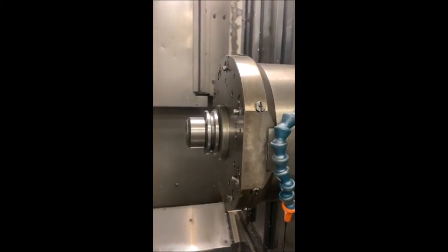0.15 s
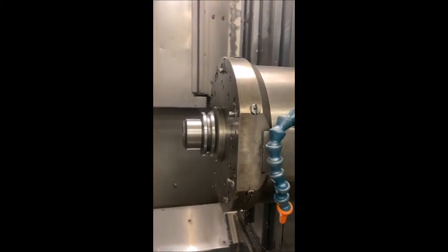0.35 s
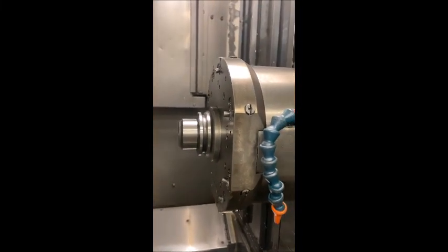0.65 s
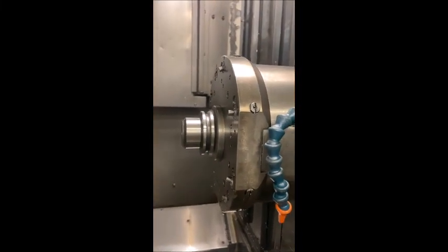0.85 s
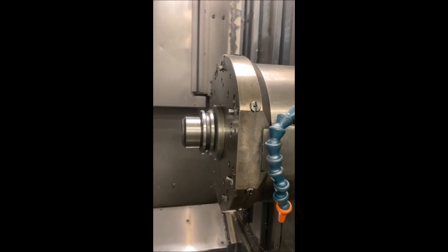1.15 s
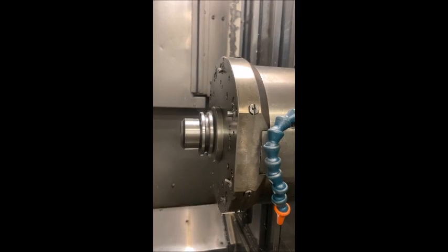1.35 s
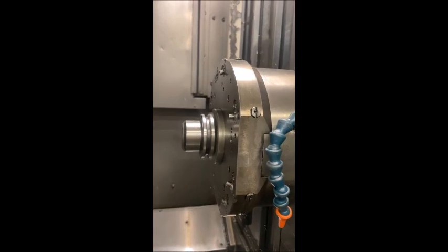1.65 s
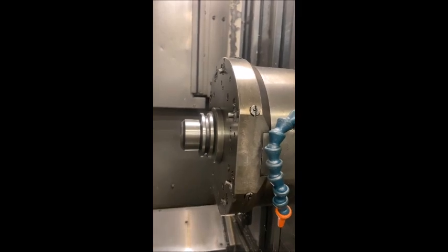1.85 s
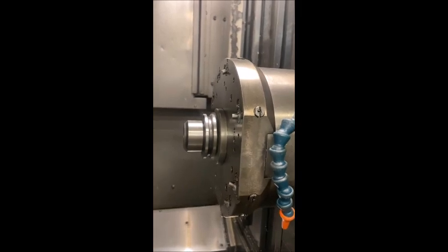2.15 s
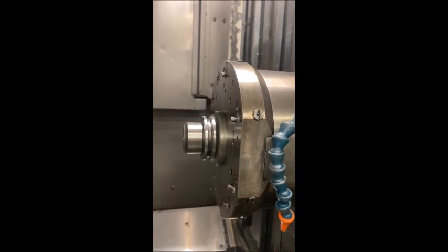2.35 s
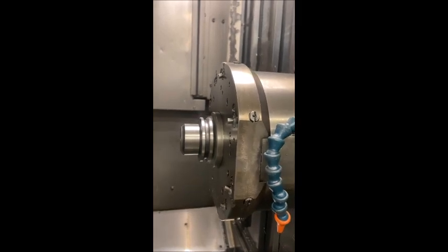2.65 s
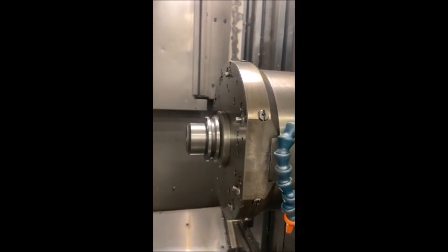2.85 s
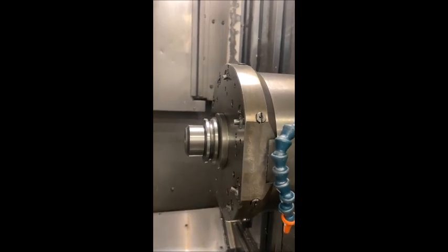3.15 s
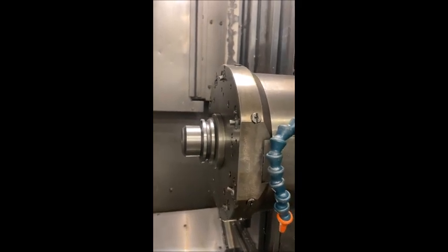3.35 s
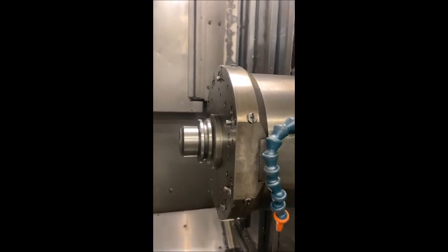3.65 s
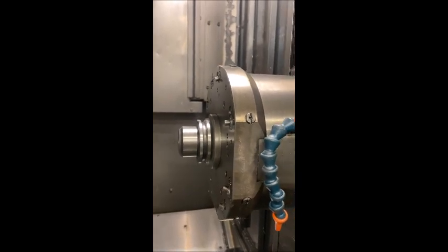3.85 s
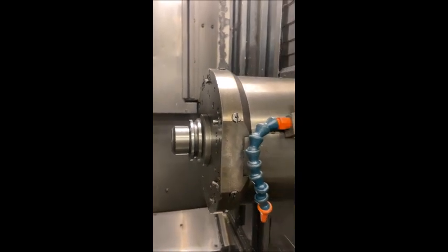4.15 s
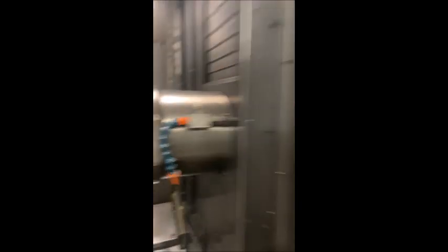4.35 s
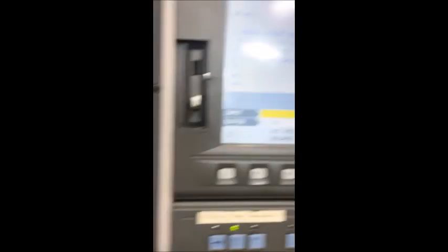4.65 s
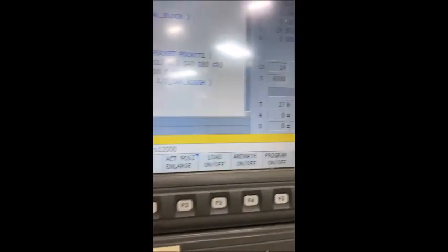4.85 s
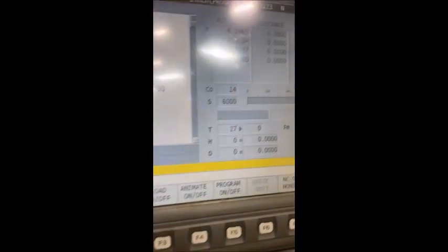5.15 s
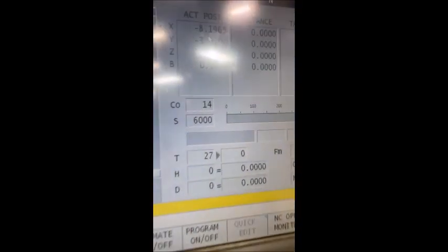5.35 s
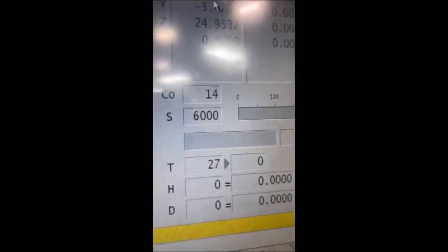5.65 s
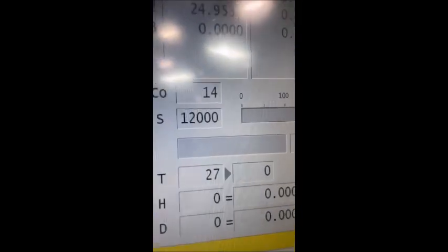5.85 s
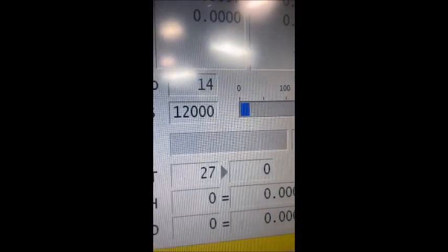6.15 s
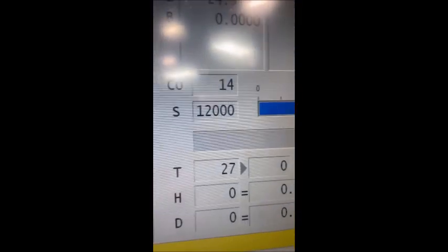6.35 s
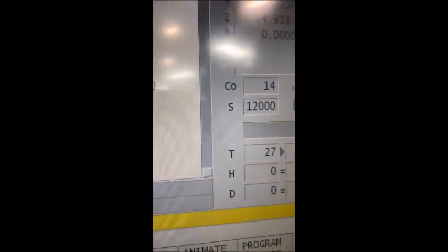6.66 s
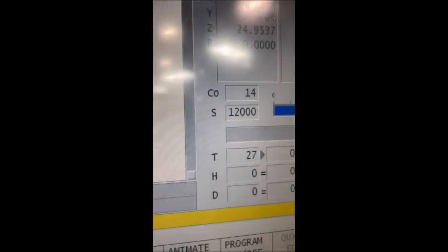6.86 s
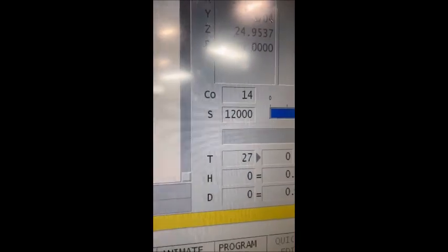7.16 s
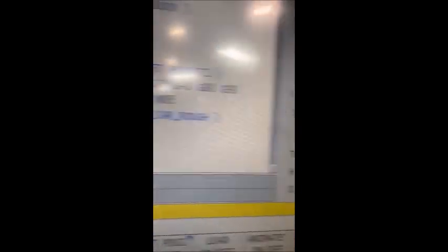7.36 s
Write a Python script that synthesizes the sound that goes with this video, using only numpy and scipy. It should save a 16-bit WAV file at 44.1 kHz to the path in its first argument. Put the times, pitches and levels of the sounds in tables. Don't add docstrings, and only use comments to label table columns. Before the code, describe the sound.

Inside an open steel machine cabin, an unloaded spindle runs with an even bearing whir, low hum and airy noise. The handheld phone swings away to the control panel, dulling the whir and bringing out a fluttering fan drone. A relay clicks, a shrill motor whine climbs for nearly a second in the reverberant hall, then stops climbing, leaving a louder, faster rushing hum.

```python
import sys
import numpy as np
from scipy import signal
from scipy.fft import rfft, irfft, next_fast_len
from scipy.io import wavfile
from scipy.ndimage import uniform_filter1d, map_coordinates

SR = 44100
rng = np.random.default_rng(int(sys.argv[2]) if len(sys.argv) > 2 else 0)


def natural_amplitude(level_db):
    exponent = np.asarray(level_db, float) / 20
    return 10 ** exponent


def store_wav(level_fs):
    pcm = np.round(np.clip(np.atleast_2d(level_fs), -1, 1) * 32767)
    wavfile.write(sys.argv[1], SR, pcm.T.astype(np.int16))


N = 331191
T = np.arange(N) / SR


def walk(rate_hz, size=N):
    k = int(SR / rate_hz)
    held = np.repeat(rng.standard_normal(size // k + 1), k)
    return 1.31 * uniform_filter1d(uniform_filter1d(held, k), k)[:size]


def lagged(x, seconds):
    k = int(seconds * SR)
    return uniform_filter1d(x, size=k, origin=(k - 1) // 2, mode="nearest")


def resonance_db(hz, peaks):
    return sum(db / (1 + (2 * (hz - at) / max(width, at / 50)) ** 2) for at, width, db in peaks)


def ring(x, hz, t60_s):
    r = np.exp(-np.log(1000) / (t60_s * SR))
    return signal.lfilter([1 - r, 0, r - 1], [1, -2 * r * np.cos(2 * np.pi * hz / SR), r * r], x)


def tones(turns, table, share, wobble_db, drift_rad, rate_hz):
    out, heard = np.zeros((2, N)), share > 0
    turns = turns[heard]
    turns_per_khz = np.ptp(turns) * SR / len(turns) / 3000
    left, right = np.zeros((2, len(turns)), np.float32)
    for multiple, left_db, right_db, lead_rad in table:
        sway = walk(rate_hz, size=len(turns))
        angle = 2 * np.pi * (multiple * turns % 1 + rng.random())
        angle += drift_rad * (1 + multiple * turns_per_khz) * sway
        angle = angle.astype(np.float32)
        size = np.sqrt(2) * natural_amplitude(wobble_db * sway[::-1])
        left += natural_amplitude(left_db) * size * np.sin(angle)
        right += natural_amplitude(right_db) * size * np.sin(angle + np.float32(lead_rad))
    out[:, heard] = left, right
    return share * out


# hz, width_hz, side_lift_db
PORTS_DIFFER = [(3130, 750, 4), (5650, 500, -2), (2000, 300, -2.5)]
PORTS_AGREE = 15100, 1300, 9.5


def air(table, peaks, flicker_db, share):
    heard = share > 0
    size = next_fast_len(int(heard.sum()))
    f = np.maximum(np.arange(size // 2 + 1) * SR / size, 1)
    hz, *columns = np.transpose(table)
    mid_db, side_db, like, lead_rad = (np.interp(np.log(f), np.log(hz), c) for c in columns)
    lift_db = resonance_db(f, peaks) - 40 * (f < 30)
    lift_db += 1.8 * np.interp(f, np.arange(0, SR / 2, 25), rng.standard_normal(SR // 50))
    side_db += resonance_db(f, PORTS_DIFFER)
    mid_db += resonance_db(f, [PORTS_AGREE])
    like = np.clip(like, 0, .95)
    a, b = rfft(rng.standard_normal((2, size)))
    mid = a * natural_amplitude(mid_db + lift_db)
    side = like * a * np.exp(1j * lead_rad) + np.sqrt(1 - like ** 2) * b
    side = side * natural_amplitude(side_db + lift_db)
    ports = np.array([mid + side, mid - side])
    out = np.zeros((2, N))
    for centre_hz in 2. ** np.arange(5, 15, 1.5):
        band = np.clip(1 - abs(np.log2(f / centre_hz)) / 1.5, 0, 1)
        flicker = natural_amplitude(flicker_db * (1.5 + centre_hz / 9000) * walk(13, size=size))
        wave = flicker * irfft(band * ports, size)
        out[:, heard] += wave[:, :heard.sum()]
    return share * out * np.sqrt(SR / 2)


# hz, mid_db_per_hz, side_db_per_hz, likeness_0_1, side_leads_rad
AIR_DOOR = [(36, -77, -63, .2, 1), (155, -55.5, -71, .1, 4), (266, -57, -70.5, 0.3, -3.5),
            (412, -72, -72, 0.05, 0.5), (1330, -70.5, -70.5, 1, -4.5), (5500, -78, -81.5, 0.38, -4.5),
            (8700, -83, -74, .4, -5), (14100, -104, -88.5, .07, -2)]
AIR_PANEL = [(35, -61.5, -89, 0.18, -2), (146, -55, -85, .1, -1), (273, -57.5, -74.5, .9, -2.5),
             (530, -70.5, -70.5, .4, -3), (1070, -72, -69, 0.14, 0.5), (5300, -79, -83, 0.3, 2),
             (8530, -95, -86, .4, 1.6), (15000, -114, -101, 0.056, 1)]
AIR_FAST = [(35, -60, -100, .4, -2), (150, -53.5, -71, .2, -3), (254, -59, -72, .4, -3.5),
            (700, -69.5, -66, .3, -4), (1100, -73, -72, 0.26, 1), (5870, -74.5, -78, .45, 1.6),
            (9840, -94, -81.5, .5, 1.6), (15000, -105, -91, .1, 0)]
# hz, width_hz,
# lift_db
CABIN = [(960, 73, 9.5), (1820, 86, 5.5), (2538, 65, 7.5), (2665, 62, 7), (3157, 54, 7.5), (3246, 50, 8),
         (3300, 50, 0.5), (3520, 143, 11.5), (4150, 70, 5), (4440, 230, 5.5), (4960, 80, 11.5),
         (5070, 60, 6), (5345, 130, 12.5), (6350, 110, 7), (6760, 80, 5.5), (7500, 220, -14.5),
         (11350, 5900, -5),
         (2090, 430, -3), (2940, 580, 3), (9630, 1450, -4), (141, 9.7, -5.5), (188, 6.3, -5),
             (215, 15, -3), (289, 11, -5.5), (378, 15, -2.5), (45, 11, 17), (83, 8, 7), (690, 36, 4)]
HALL = [(258, 20, 2.5), (508, 45, 7.5), (693, 21, 3), (2800, 40, 6), (3206, 50, 8), (3330, 58, -2),
        (4400, 120, 3), (13000, 5300, -4.5)]
PANEL_DIPS = [(1870, 450, -3.5), (3390, 420, 4)]
FAST_LIFTS = [(1910, 190, 4.5), (334, 39, 3), (3580, 30, 2.8), (980, 62, 6.8)]


def air_noise(door, panel, fast):
    strain_db = 2 * np.exp(-((T - 6.2) / .15) ** 2)
    slow = panel * np.sqrt(1 - fast) * natural_amplitude(strain_db)
    noise = air(AIR_DOOR, CABIN, .4, door)
    noise += air(AIR_FAST, HALL + FAST_LIFTS, .5, panel * np.sqrt(fast))
    return noise + air(AIR_PANEL, HALL + PANEL_DIPS, .88, slow)


# hz, left_db, right_db, right_leads_rad
HUM = [
    [(239, -50.5, -49, 0.25), (267.5, -43.5, -40.5, -0.04), (301.4, -53.5, -49, 0.57), (349, -51, -49, 1.07), (504, -55.5, -52, 0.97), (532, -55, -51.5, 0.02), (775, -52, -57, 0.28), (880, -66, -63, -0.15)],
    [(176.6, -41, -41, 0), (446, -67, -62, -1), (697, -66, -50, 1.8), (764, -61, -50.5, 2.2), (959, -56, -55, -1), (898, -53, -50.5, 1), (2064, -56.5, -59.5, 0.5), (2556, -53, -55, 0.93), (2830, -63.5, -60, -1.5), (3435, -55, -50.5, -1.64)],
]
# hz, level_db
BASS_HUM = [(41.4, -51), (59.8, -34), (71.8, -41), (120, -37.5), (164.7, -43), (200, -47)]


def hum(door, panel):
    bass = [(hz, db, db, 0) for hz, db in BASS_HUM]
    at_door = tones(T, HUM[0], door, 1.16, .37, 6) + tones(T, bass, door, 1.4, .29, 6)
    return at_door + tones(T, HUM[1], panel, 3.1, .83, 8)


# hz, left_db, right_db, right_leads_rad
MAINS = [(59.9, -41.5, -41.5, -0.0), (120.2, -32.0, -32.0, 0.0), (240.3, -36.0, -35.5, 0.12),
         (300.2, -48.0, -44.5, 0.11)]
PANEL_FAN = [(512.6, -49, -43, 0.54), (527, -54, -42.5, -1.4)]
FAN_THIRD = [(776, -47, -44, 1.86)]
FAN = [
    (256.5, 0.5, 2, .1),
    (251.4, -1, 0, 0.11),
    (268.5, -6.5, -7.5, 0.082),
]
# peak_s, lift_db
SURGES = [(4.62, 6.5), (4.76, 10), (4.94, 9), (5.38, 14.5), (5.62, 8.5), (5.72, 6.5), (6.09, 13.5),
          (6.32, 11.5), (6.58, 7), (6.68, 2), (6.86, 9.5), (7.06, 14.5), (7.44, 0)]


def fan(panel, fast):
    overtone_db = 11 * (np.clip((T - 4.52) / .47, 0, 1) - 1)
    mains = tones(T, MAINS[:2] + MAINS[3:], panel, 1, .25, 6.52)
    mains += tones(T, MAINS[2:3], panel * natural_amplitude(overtone_db), 1.8, .28, 8.96)
    closer = np.clip((T - 5.23) / .21, 0, 1)
    nearest_db = 5 * np.exp(-((T - 5.55) / .25) ** 2)
    small = tones(T, PANEL_FAN, panel * natural_amplitude(7.5 * (closer - 1.5) + nearest_db), 4.1, 2.1, 30)
    shade_db = 6.5 * closer * (1.5 - .74 * fast)
    small += tones(T, FAN_THIRD, panel * natural_amplitude(-shade_db), 4, 1.9, 14)
    base_db, rise_s, fall_s = -39, .04, .053
    surge_db = sum(db * np.exp(-((T - s) / np.where(T < s, rise_s, fall_s)) ** 2) for s, db in SURGES)
    blade = tones(T, FAN[:1], panel * natural_amplitude(base_db + surge_db), .64, .98, 8.8)
    return mains + small + blade + tones(T, FAN[1:], panel * natural_amplitude(base_db), 2.5, .56, 8)


# start_s, peak_db, hz, t60_s, side_share_0_1
KNOCKS = [
    (2.1305, -19, 1600, 0.0058, 0.9),
    (2.1315, -15, 2840, .004, 0.5),
    (4.385, -19.5, 55.4, 0.18, 0),
    (5.795, -18, 2600, 0.0049, 1),
    (5.795, -18, 1260, 0.0087, 0.75),
]


def knocks():
    out = np.zeros((2, N))
    for start_s, db, hz, t60_s, side in KNOCKS:
        t = np.maximum(T - start_s, 0)
        knock = natural_amplitude(db) * np.sin(2 * np.pi * hz * t) * np.exp(-np.log(1000) * t / t60_s)
        out += knock * np.array([[1], [1 - 2 * side]])
    return out


IDLE_HZ, TOP_HZ = 100, 200
CLIMB_S, CLIMB_LENGTH_S, BEND_S, TORQUE_RISE_S = 5.905, .915, .87, .03


def speed():
    since_s = np.clip(T - CLIMB_S, 0, CLIMB_LENGTH_S)
    gained = np.expm1(-since_s / BEND_S) / np.expm1(-CLIMB_LENGTH_S / BEND_S)
    return IDLE_HZ + (TOP_HZ - IDLE_HZ) * lagged(gained, TORQUE_RISE_S)


def shaken(wave, door_db, panel_db, modes, door, panel):
    rung = sum(natural_amplitude(db) * ring(wave * panel, hz, t60_s) for hz, t60_s, db in modes)
    direct = (natural_amplitude(door_db) * door + natural_amplitude(panel_db) * panel) * wave
    return np.sqrt(2) * (direct + rung)


# hz, t60_s, level_db
UNBALANCE_MODES = [(100, 1.2, -34.5), (123.2, 0.92, -18), (130.7, 0.59, -16), (147.7, 0.36, -22.5),
                   (164.7, 0.13, -27), (199.4, 2.65, -19)]
OVALITY_MODES = [(238, 1, -25), (342, .15, -40.5), (390.3, 0.36, -33.5), (400.5, 2.8, -29)]


def body_shake(turns, door, panel):
    unbalance = np.sin(2 * np.pi * turns)
    ovality = np.sin(4 * np.pi * turns + np.array([[0], [-.7]]))
    body = shaken(unbalance, -30.5, -55.5, UNBALANCE_MODES, door, panel)
    return body + shaken(ovality, -56.5, -64, OVALITY_MODES, door, panel)


PORT_LAG_SAMPLES = 5


def hall(x, near_t60_s, far_t60_s, direct_db, far_db, like):
    t = np.arange(SR) / SR
    near, far = rng.standard_normal((2, 2, len(t)))
    far = signal.sosfilt(signal.butter(3, 6200, fs=SR, output="sos"), far)

    def decay(t60_s):
        return np.exp(-np.log(1000) * t / t60_s) / np.sqrt(t60_s * SR / np.log(1000) / 2)

    shared, own = .8 * (near * decay(near_t60_s) + natural_amplitude(far_db) * far * decay(far_t60_s))
    shared[0] += natural_amplitude(direct_db)
    right = -like * np.roll(shared, PORT_LAG_SAMPLES) + np.sqrt(1 - like ** 2) * own
    return signal.fftconvolve(x[None], np.array([shared, right]), axes=1)[:, :N]


# hz, width_hz, lift_db
HOUSING = [(4400, 150, 4.5), (5400, 220, 3), (5710, 670, 11.7), (6350, 380, 6.5), (7250, 340, 10.7),
           (7580, 300, 5.4), (8200, 680, 5)]
STATOR_HOUSING = [(5200, 1000, 14), (6640, 400, 12), (7050, 500, 14)]


def motor_whine(hz, turns):
    torque = (T > CLIMB_S) * (T < CLIMB_S + CLIMB_LENGTH_S + TORQUE_RISE_S / 2)
    rotor_slots, stator_slots = 44, 36
    rotor_hz, stator_hz = rotor_slots * hz, stator_slots * hz
    rotor_db = -40 - 2.5 * (rotor_hz - rotor_hz[0]) / 1000 + resonance_db(rotor_hz, HOUSING)
    stator_db = -60.5 + resonance_db(stator_hz, STATOR_HOUSING)
    slots = natural_amplitude(rotor_db) * np.sin(2 * np.pi * rotor_slots * turns)
    slots += natural_amplitude(stator_db) * np.sin(2 * np.pi * stator_slots * turns)
    flutter = 1 + .25 * np.sin(2 * np.pi * turns) + .3 * walk(150)
    drive = uniform_filter1d(1. * torque, size=200) * flutter * slots
    return natural_amplitude(4.5) * hall(drive, near_t60_s=.3, far_t60_s=.8, direct_db=-6, far_db=-2, like=.42)


SHAFT_ORDERS = [
    (6, 8, 9, 10, 11, 12, 13, 14, 15, 16, 17, 18, 22, 25, 27, 29, 34, 35, 42, 43, 44, 51, 54),
    (3, 7, 9, 28, 39),
    (3, 7, 9, 12, 13, 16),
]
CAGE_ORDERS = [
    (23, 25, 26, 27, 28, 29, 49, 50, 51),
    (25, 26, 49, 50),
    (24, 25, 49),
]
# left_db, right_db, right_leads_rad
SHAFT = [
    [(-62.5, -54.5, -0.81), (-64.0, -53.5, 3.11), (-44.5, -38.0, 2.54), (-60.0, -47.5, -0.2), (-63.5, -61.0, 2.35), (-57, -54, 1.8), (-51.0, -55.0, -1.38), (-60.0, -54.5, 0.09), (-58.0, -58.5, -2.22), (-52.0, -47.5, -1.51), (-67.0, -58.5, -0.19), (-51.0, -45.0, -0.75), (-62.5, -63.0, -1.29), (-51.5, -50.0, -1.53), (-50.5, -51.5, -1.87), (-52.5, -48.0, -1.55), (-51.0, -48.5, -1.93), (-52.0, -55.5, -1.32), (-58.0, -66.5, -0.75), (-55.5, -55.0, -0.56), (-54.0, -54.0, -0.72), (-66.0, -53.5, -1.98), (-63.5, -63.0, -0.99)],
    [(-53.5, -50.0, 0.04), (-59.0, -56.5, 1.23), (-53.0, -49.5, -2.21), (-52.5, -50.5, 1.34), (-60.5, -59.0, -1.12)],
    [(-52.0, -44.5, 1.97), (-56, -58, 1.5), (-62.5, -64.0, 1.13), (-47, -56.0, 2.86), (-52.5, -63.5, 1.81), (-50, -54, -0.5)],
]
CAGE = [
    [(-64.0, -48.0, 2.16), (-45.5, -32.5, 1.78), (-38.0, -36.0, 1.8), (-61.0, -58.5, -3.12), (-51.5, -59.5, -2.01), (-62.0, -56.5, -2.25), (-56.5, -61.0, -1.74), (-53.0, -49.5, -0.32), (-54.5, -53.5, -0.29)],
    [(-43.5, -47.0, -1.18), (-45.5, -53.0, 0.56), (-57.5, -68.0, 0.54), (-65.0, -62.0, -3.0)],
    [(-54.5, -54.5, -2.45), (-47.0, -53.0, -0.79), (-53.0, -54.0, -0.29)],
]


def bearing_orders(hz, turns, shares):
    cage_ratio = np.interp(hz, [hz[0], hz[-1]], [.459, .4554])
    cage_turns = np.cumsum(hz * cage_ratio) / SR
    out = np.zeros((2, N))
    for i, wobble_db in enumerate((2.5, 3, 4)):
        shaft = [(k, *row) for k, row in zip(SHAFT_ORDERS[i], SHAFT[i])]
        cage = [(k, *row) for k, row in zip(CAGE_ORDERS[i], CAGE[i])]
        out += tones(turns, shaft, shares[i], wobble_db, .77, 6.5)
        out += tones(cage_turns, cage, shares[i], .5 * wobble_db, .21, 4.37)
    return out


def spindle(hz, door, panel, fast, slow_db):
    turns = np.cumsum(hz) / SR
    shares = door, panel * (1 - fast) * natural_amplitude(slow_db), panel * fast
    return body_shake(turns, door, panel) + motor_whine(hz, turns) + bearing_orders(hz, turns, shares)


# time_s, turned_0_1, slow_spindle_at_panel_db
TURN = [
    (4.2, 0, 4),
    (4.4, 0.4, -11),
    (4.65, 0.95, -1.5),
    (5.3, 1.01, -0.5),
    (5.45, 1.02, -4.5),
    (5.6, 1.04, -14),
    (6.2, 1.04, -9),
    (6.6, 1.05, -34),
]


def scene():
    time_s, turned, slow_db = np.transpose(TURN)
    turned = np.clip(np.interp(T, time_s, turned), 0, 1)
    slow_db = np.interp(T, time_s, slow_db)
    hz = speed()
    fast = np.clip(lagged((hz / IDLE_HZ - 1).clip(0) ** 2.7, .07), 0, 1)
    door, panel = np.sqrt(1 - turned), np.sqrt(turned)
    background = air_noise(door, panel, fast) + hum(door, panel) + fan(panel, fast) + knocks()
    return background + spindle(hz, door, panel, fast, slow_db)


def drifting(f, t):
    width_hz, hold_s = 90, .22
    cells = rng.standard_normal((int(f.max() / width_hz) + 2, int(t.max() / hold_s) + 2))
    field = map_coordinates(cells, np.broadcast_arrays(f / width_hz, t / hold_s), order=1)
    return 2.1 * field * np.clip(f / 1400 - 1, 0, 1)


# hz, share_of_time_0_1
STARVED = [(3500, 0), (3800, .09), (4050, .05), (4250, 0), (5600, 0), (6000, .1), (6800, .02), (7500, .55),
           (8000, .2), (8800, .4), (9600, .7), (11000, 0)]


def masked(x):
    f, t, spec = signal.stft(x, SR, nperseg=1024)
    f = f[:, None]
    spec = spec * natural_amplitude(drifting(f, t))
    power = uniform_filter1d(uniform_filter1d(abs(spec) ** 2, size=3, axis=1), size=3, axis=2)
    level_db = 10 * np.log10(power + 1e-20)
    slope_db = 6 * f / 1000
    spread_db = np.maximum.accumulate(np.where(f > 5300, level_db + slope_db, -200), axis=1) - slope_db
    under_db = spread_db - 21 - uniform_filter1d(level_db, size=9, axis=1)
    hidden = np.clip(under_db / 3, 0, 1) * (f < 9500)
    band, cell = (f / 170).astype(int), (t / .05).astype(int)
    luck = rng.standard_normal((band.max() + 1, cell.max() + 1))
    luck = uniform_filter1d(luck, size=2, axis=0) * np.sqrt(2)
    chance = 1 / (1 + np.exp(-1.7 * luck[band, cell]))
    weak = level_db[0] < np.median(level_db[0], axis=1, keepdims=True) + 9
    hidden[0] = np.maximum(hidden[0], weak * (chance < np.interp(f, *np.transpose(STARVED))))
    return signal.istft(spec * natural_amplitude(-20 * hidden), SR, nperseg=1024)[1][:, :N]


def low_pass(x):
    return signal.sosfilt(signal.butter(12, 15650, fs=SR, output="sos"), x)


def record(dry):
    dry = signal.sosfilt(signal.butter(2, 30, "highpass", fs=SR, output="sos"), dry)
    mid, side = dry.mean(axis=0), (dry[0] - dry[1]) / 2
    side = signal.sosfilt(signal.butter(2, 120, "highpass", fs=SR, output="sos"), side)
    mid, side = masked(np.array([mid, side]))
    return low_pass(np.array([mid + side, mid - side]))


dry = scene()
out = record(dry)
store_wav(out)
```